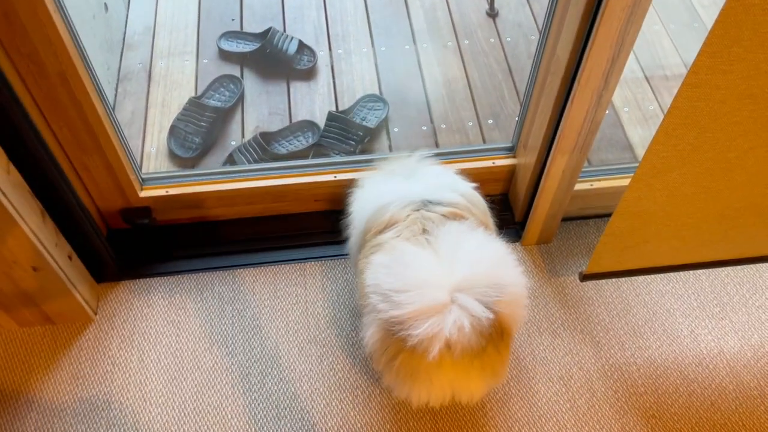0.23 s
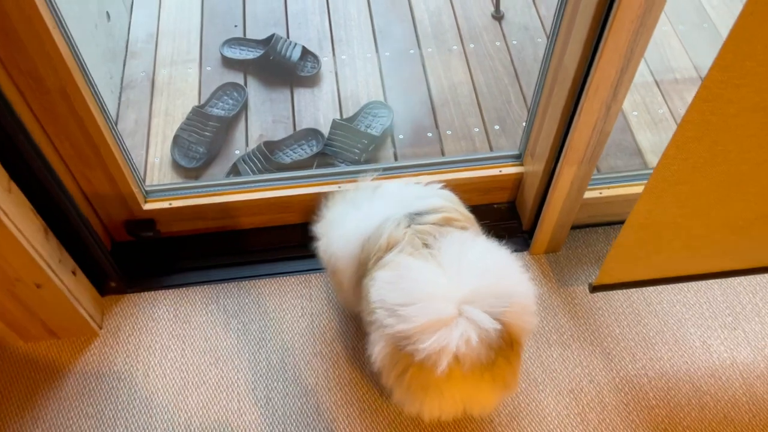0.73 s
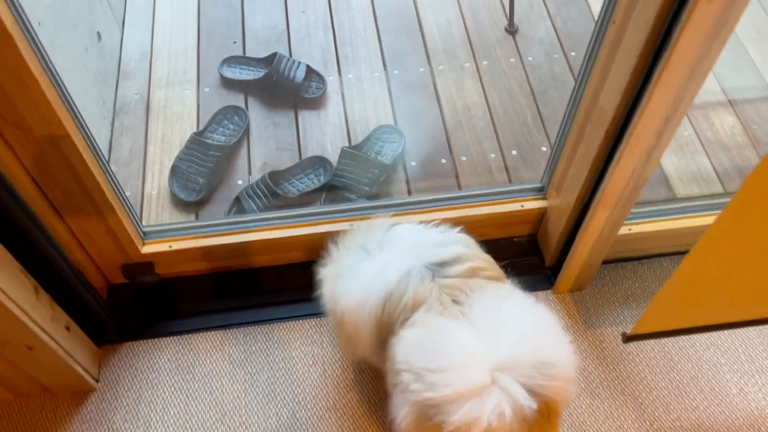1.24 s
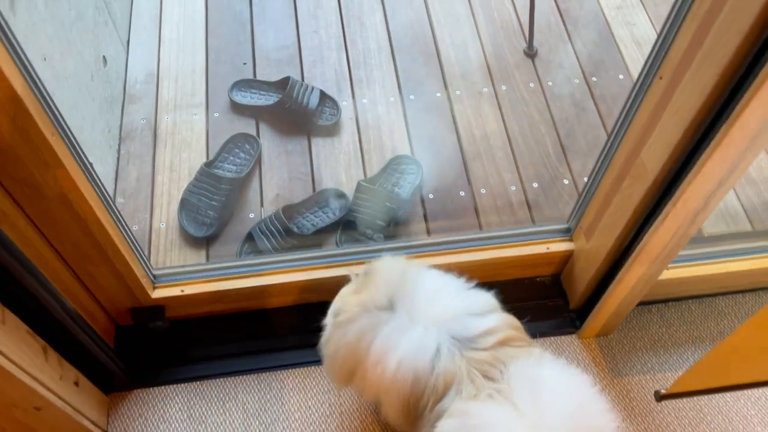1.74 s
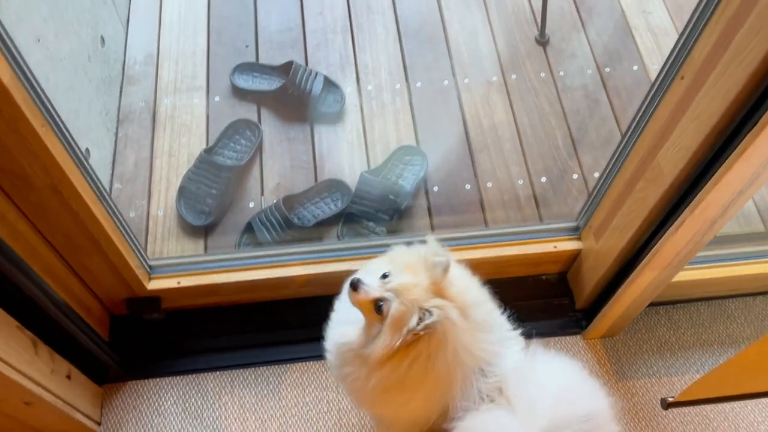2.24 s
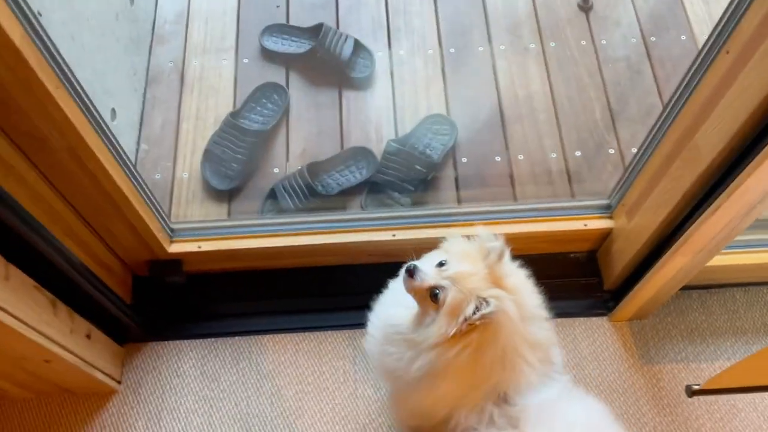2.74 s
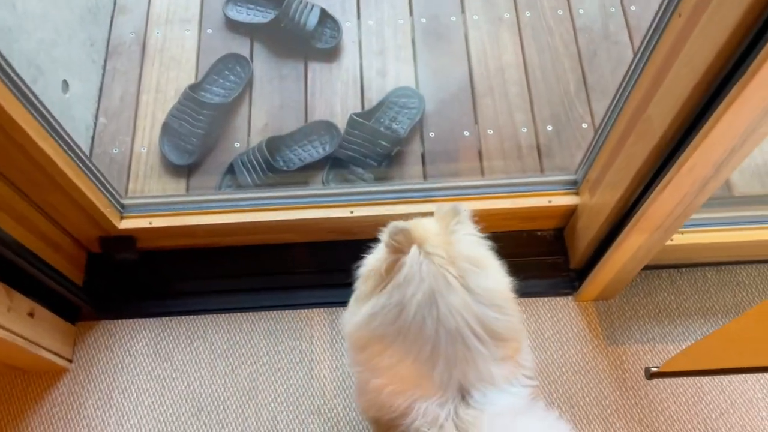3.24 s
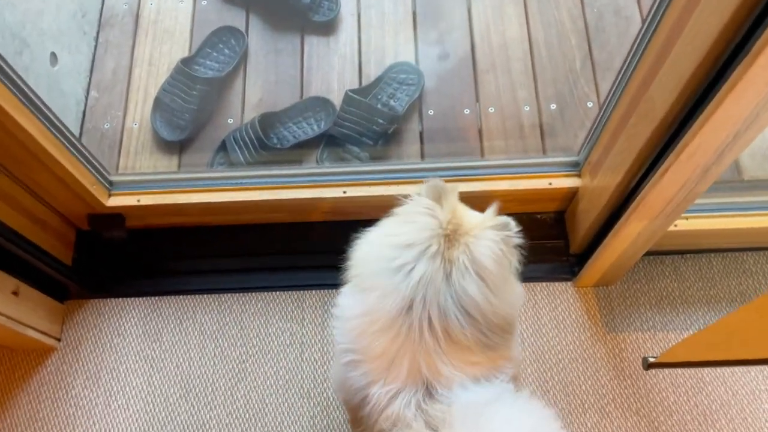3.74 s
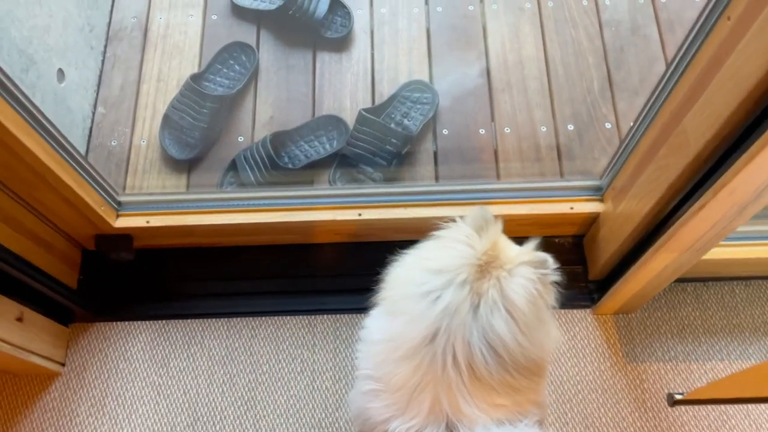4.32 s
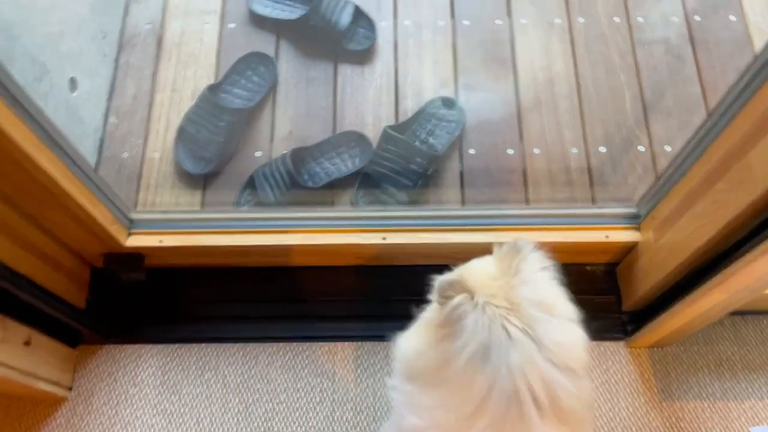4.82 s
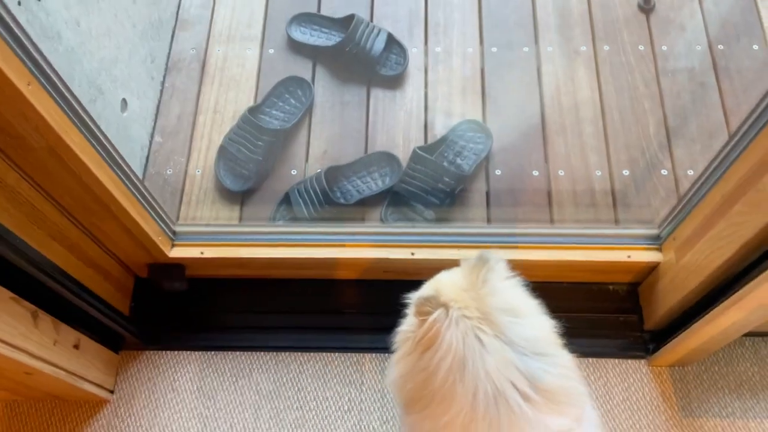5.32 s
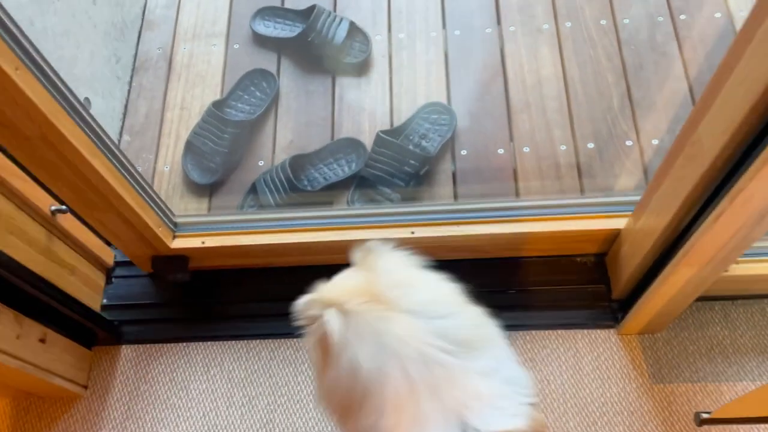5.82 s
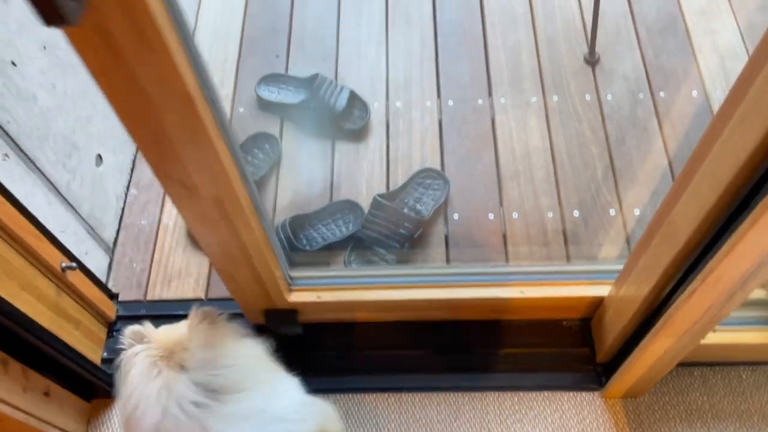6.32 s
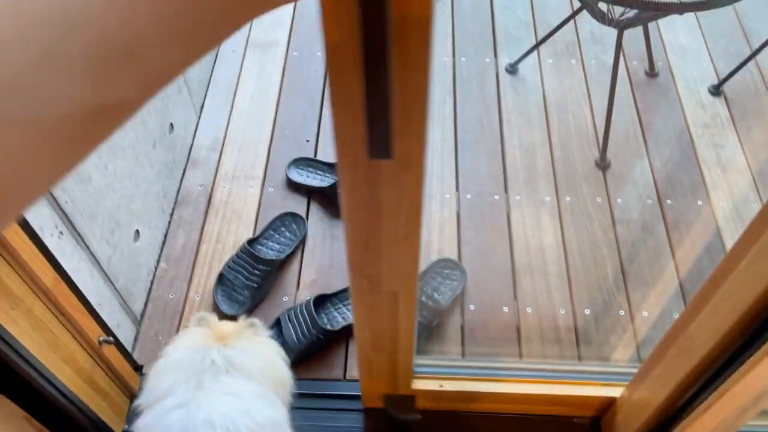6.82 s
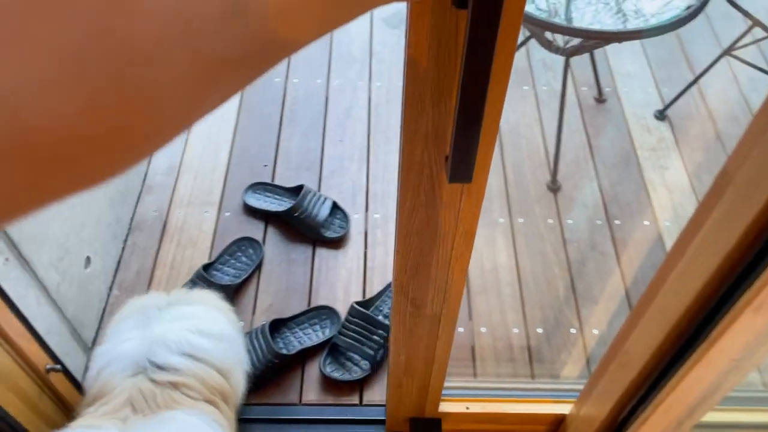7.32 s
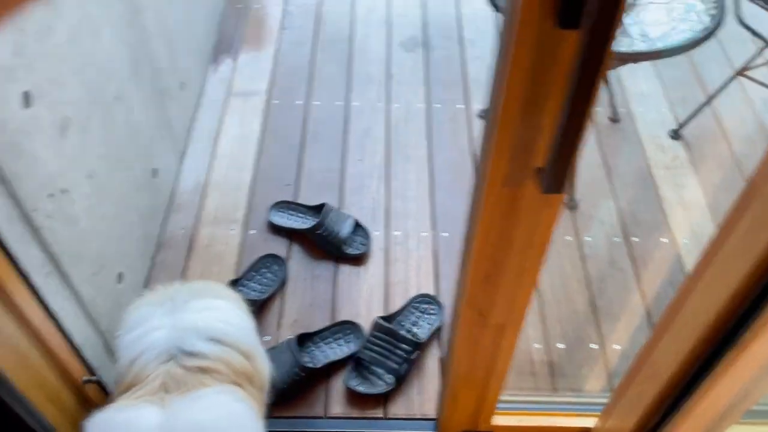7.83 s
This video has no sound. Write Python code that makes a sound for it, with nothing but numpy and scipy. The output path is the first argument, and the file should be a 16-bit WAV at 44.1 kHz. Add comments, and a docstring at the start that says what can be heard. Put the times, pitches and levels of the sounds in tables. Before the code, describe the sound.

Low house hum, dry bumps and soft rustling, then a metal latch clacks and a wooden glass door slides open with a rushing, squeaky hiss.

```python
"""A low house hum under a faint hiss comes first, then small dry bumps close to the microphone.
A small dog waits at a glazed sliding door: fur and clothes rustle, short knocks tap, thin whistles pass.
A hand scrapes and ticks the loose handle and the metal latch rings; the leaf thuds and rolls along its track,
hissing, rubbing and squealing. Friction is shaped noise; blows and knocks are sums of dying modes;
squeals and whines are noise in narrow moving resonances, and the room is a tail of sparse echoes."""
import sys
import numpy as np
from scipy import signal
from scipy.fft import rfft, irfft, next_fast_len
from scipy.io import wavfile
from scipy.ndimage import uniform_filter1d

SR = 44100
rng = np.random.default_rng(int(sys.argv[2]) if len(sys.argv) > 2 else 0)


def generate_wav(sig):
    """Save sig (samples, or channels by samples) to the path in sys.argv[1] as 16-bit PCM at SR."""
    pcm = np.round(np.clip(np.atleast_2d(sig).T, -1, 1) * 32767).astype(np.int16)
    wavfile.write(sys.argv[1], SR, pcm)


N = 355887

# likeness of the sound at the two microphone ports: pitch_hz, likeness (0 to 1)
LIKENESS = [(60, 0.97), (200, 0.89), (450, 0.5), (1300, 0.37), (2500, 0.3), (5000, 0.15), (7000, 0.3),
            (8700, 1), (11000, 0.63), (13500, 1), (16000, 1)]
# resonances of the loose handle: pitch_hz, width_hz, level_db (relative)
HANDLE_MODES = [(1080, 160.5, 1), (1900, 218, -8.5), (2650, 301, -11.5), (3500, 259, -5),
                (4650, 400, -13.5)]
# spectrum of the runner and its seals: pitch_hz, level_db (relative, per Hz)
RUNNER_SPECTRUM = [(400, -7.5), (900, -2), (1300, -2.5), (1800, -2.5), (2500, -1), (4200, -1), (5300, -5),
                   (6300, -12), (7500, -15.5), (10000, -19), (13000, -16), (16000, -24.5)]

TAP_T60_S = 0.05


def gain_of(db):
    """Turns dB into a gain."""
    return 10 ** (np.asarray(db) / 20)


def evened(x):
    """Scales to rms 1."""
    return x / np.sqrt(np.mean(x ** 2) + 1e-20)


def read(points, hz):
    """Reads a spectrum table on a log-frequency axis."""
    f, value = np.transpose(points)
    return np.interp(np.log(hz + 1), np.log(f + 1), value)


def curves(rows):
    """All columns of a curve table, sample by sample, and a soft window over its span."""
    s, *columns = np.transpose(rows)
    t = np.arange(N) / SR
    to_edge = np.minimum(t - s[0], s[-1] - t) / 0.012
    at_file_edge = (s[0] < 0.01) + (s[-1] > 8)  # no fade where the curve meets the start or end
    inside = (t >= s[0]) * (t <= s[-1] + (s[-1] > 8))
    window = np.clip(to_edge + at_file_edge, 0, 1) * inside
    return [np.interp(t, s, c) for c in columns], window


def swell(peak_s, db, rise_s, fall_s):
    """Power that climbs 20 dB in rise_s up to the peak and drops 20 dB in fall_s."""
    late = np.arange(N) / SR - peak_s
    steps_down = np.minimum(np.maximum(-late / rise_s, late / fall_s), 5)
    return gain_of(2 * (db - 20 * steps_down))  # doubled dB makes power


def chance(seconds):
    """Slow random wobble, rms 1: noise averaged twice over the given time."""
    size = round(seconds * SR)
    smooth = uniform_filter1d(rng.standard_normal(N), size=size)
    return evened(uniform_filter1d(smooth, size=size))


def add(mix, s, sound):
    """Mixes a stereo sound in at time s."""
    part = mix[:, round(s * SR):][:, :sound.shape[1]]
    part += sound[:, :part.shape[1]]


def panned(x, pan_db):
    """Places a mono sound left or right by its L-R level."""
    return x * gain_of([[pan_db / 2], [-pan_db / 2]])


def resonate(x, hz, width):
    """Shifts the curve hz down to zero, smooths twice (each pass width Hz wide), and shifts back."""
    turn = np.exp(2j * np.pi * np.cumsum(hz * np.ones(x.shape[-1])) / SR)
    r = np.exp(-np.pi * width / SR)
    smooth = signal.lfilter([(1 - r) ** 2], [1, -2 * r, r * r], x / turn, axis=-1)
    return (turn * smooth).real


def hiss(spectrum, size, patchy_db, lo_hz=0, hi_hz=20000, pan=((1, 0), (2, 0)), shape=(8, 6), peaks=()):
    """Stereo noise of a given spectrum between two edges, with patches (bins, frames) and peaks; rms 1."""
    hop, hz = size // 2, np.fft.rfftfreq(size, 1 / SR)
    a, b, c, d, patches = rng.standard_normal((N // hop + 3, len(hz), 5), dtype=np.float32).T
    patches = uniform_filter1d(patches, size=shape[0], axis=0)
    patches = evened(uniform_filter1d(patches, size=shape[1], axis=1))
    like = np.clip(read(LIKENESS, hz), 0, 1)[:, None]
    left = a + 1j * b
    right = like * left + np.sqrt(1 - like ** 2) * (c + 1j * d)
    lean = gain_of(read(pan, hz) / 2)[:, None]
    z = np.array([left * lean, right / lean])
    edges = 1 / np.sqrt((1 + (lo_hz / (hz + 1)) ** 8) * (1 + (hz / hi_hz) ** 8))
    rings_db = sum(db / (1 + (2 * (hz - f) / w) ** 2) for f, w, db in peaks)
    z *= gain_of((read(spectrum, hz) + rings_db)[:, None] + patchy_db * patches) * edges[:, None]
    return evened(signal.istft(z, window="cosine", nperseg=size, noverlap=hop)[1][:, :N])


def ring(modes, tilt_db=0, damping=1, length=SR // 4):
    """A struck set of modes (Hz, dB, t60 s); the tilt, dB an octave, turns about 2.4 kHz."""
    t = np.arange(length) / SR
    return sum(gain_of(db + tilt_db * np.log2(hz / 2400) - 60 * damping * t / t60) * np.sin(2 * np.pi * hz * t)
               for hz, db, t60 in modes)


def crack(t60, tilt_db=0):
    """A short burst of wide noise with a quick rise, tilted about 2.4 kHz."""
    t, hz = np.arange(SR // 4) / SR, np.fft.rfftfreq(SR // 4, 1 / SR)
    color = gain_of(tilt_db * np.log2((hz + 300) / 2400)) / (1 + (hz / 14000) ** 16)
    noise = irfft(rfft(rng.standard_normal(len(t))) * color, len(t))
    return evened(noise) * gain_of(-60 * t / t60) * (1 - np.exp(-t / 0.0004))


def whistle(rows, width, pan_db, flutter_db):
    """Noise in one narrow moving resonance, fluttering in level."""
    (db, hz), window = curves(rows)
    out, on = np.zeros(N), window > 0
    out[on] = evened(resonate(rng.standard_normal(N)[on], hz[on], width))
    return panned(out * gain_of(db + flutter_db * chance(0.018)) * window, pan_db)


def hum():
    """Low rumble with one fuzzy note, narrow-band noise, over a steady faint hiss."""
    # rumble of the house: pitch_hz, level_db (relative, per Hz)
    hum_spectrum = [(20, -68), (30, -51), (42, -22.5), (64, -5), (78, -4.5), (90, -12), (125, -17),
                    (215, -22.5), (335, -30.5), (490, -40.5), (700, -66.5)]
    # its level, raised 0.5 dB below: start_s, level_db
    hum_level = [(0.0, -49), (1.1, -49), (2.0, -47.5), (3.9, -45.5), (4.65, -45), (5.3, -44.5),
                 (6.5, -45.5), (8.07, -46.5)]
    # the fuzzy note: pitch_hz, width_hz, mean level_db
    fuzzy_note = (64.07, 11.9, -43)
    # faint hiss: pitch_hz, level_db (relative, per Hz)
    air_spectrum = [(500, -4), (900, -5), (1800, -10.5), (3000, -29), (6000, -30), (8700, -17),
                    (12500, -13.5), (13800, -25), (14500, -38)]
    (db,), _ = curves(hum_level)
    hz, width, note_db = fuzzy_note
    note = gain_of(note_db) * evened(resonate(rng.standard_normal(N), hz, width))
    low = gain_of(db + 0.5) * hiss(hum_spectrum, size=2048, patchy_db=2.5)
    faint = gain_of(-80.5) * hiss(air_spectrum, size=512, patchy_db=0.18, lo_hz=500)
    return low + panned(note * gain_of(db - db.mean()), 0.55) + faint


def rustle():
    """Fibres brush past each other: bright swish, with a duller part when weight shifts."""
    # rustling fur and cloth: pitch_hz, level_db (relative, per Hz)
    fibre_spectrum = [(300, 5.5), (450, 1.5), (1300, 0), (1800, -3.5), (4200, -3), (6300, -5.5),
                      (8700, -1.5), (13000, -6), (14500, -22), (16000, -25)]
    # swishes: peak_s, level_db (before the 2 dB lift), rise_s and fall_s (each over 20 dB), dull_db (relative)
    swish_rows = [(.385, -70.5, 0.08, 0.12, -9), (0.469, -59.5, 0.067, 0.026, -3),
                  (.95, -68, 0.14, 0.28, -20), (1.22, -74, 0.22, 0.31, -14), (1.558, -70.5, 0.02, 0.088, 3),
                  (1.852, -58, .007, .02, -13), (1.89, -74, 0.059, 0.8, 3), (2.115, -46, 0.018, 0.14, -12),
                  (2.32, -58, 0.11, 0.24, 7), (2.5, -55.5, 0.12, 0.092, 1), (2.6, -63.5, .2, 0.3, -2.5),
                  (2.815, -52.5, 0.046, 0.24, -5), (2.92, -60, 0.2, 0.081, -18), (3.0, -71.5, .1, .55, 5.5),
                  (3.495, -53, 0.078, 0.38, -12.5), (3.72, -58.5, 0.36, 0.059, -9),
                  (3.98, -73, .04, 0.13, 17), (4.084, -67, 0.21, .27, 10), (4.3, -74, .4, 0.22, 3),
                  (4.44, -64.5, 0.095, 0.48, 7), (4.626, -39, 0.012, 0.032, -4),
                  (4.68, -58, 0.089, 0.17, 8.5), (5.2, -61, 0.097, 0.1, 9),
                  (5.312, -52.5, 0.018, 0.11, 6.5), (5.59, -63.5, 0.38, .04, 2)]
    # a dull low rustling bed dips, then gradually grows louder: start_s, level_db (before the 0.5 dB lift)
    bed_rows = [(0.0, -80), (.6, -89), (1.4, -87), (1.65, -75.5), (2.75, -81), (3.3, -70.5), (3.9, -63.5),
                (4.25, -65), (4.5, -63), (4.9, -62.5), (5.6, -58.5)]
    (bed_db,), window = curves(bed_rows)
    swells = [swell(*row[:4]) for row in swish_rows]
    weight = sum(power * gain_of(2 * row[4]) for power, row in zip(swells, swish_rows))
    weight = weight + (window * gain_of(bed_db)) ** 2
    bright = hiss(fibre_spectrum, size=256, patchy_db=1.5, lo_hz=1500, shape=(4, 6))
    dull = hiss(fibre_spectrum, size=512, patchy_db=1.5, lo_hz=337, hi_hz=1780)
    return gain_of(2.0) * np.sqrt(sum(swells)) * bright + gain_of(0.5) * np.sqrt(weight) * dull


def taps(rows, t60):
    """Each tap is a dead knock: a noisy burst about its pitch, a woody thump and a crack."""
    # the wooden frame thumps with: pitch_hz, level_db (relative), t60_s (for a full-length tap)
    frame_modes = [(407, -2.5, 0.046), (640, -8, 0.032)]
    out = np.zeros((2, N))
    for s, db, hz, crack_db, thump_db, pan_db in rows:
        body = resonate(crack(t60, -1.8), hz, hz * 1.08)
        body = body / abs(body).max() + ring([(hz, -8, t60 * 0.54)])
        thump = gain_of(thump_db) * ring(frame_modes, damping=TAP_T60_S / t60)
        bright = gain_of(crack_db - 3.5) * crack(t60 * 0.75, 7.8)
        add(out, s, panned(gain_of(db) * (body + thump + bright), pan_db))
    return out


def bumps():
    """Short dry bumps close to the microphone: the same knocks as the taps, dying sooner."""
    # start_s, level_db, pitch_hz, crack_db (before a 3.5 dB cut), thump_db, left_minus_right_db
    bump_rows = [(0.175, -57, 900, -20, -9, -9.5), (0.429, -46, 820, -18, -11, 2.5),
                 (0.4705, -36.5, 840, -14, -8, 2.5)]
    return taps(bump_rows, t60=0.018)


def small_taps():
    """Short dull and bright knocks, some giving body to the latch blows."""
    # start_s, level_db, pitch_hz, crack_db (before a 3.5 dB cut), thump_db, left_minus_right_db
    tap_rows = [(1.553, -59, 4700, -6, -15, 5), (1.592, -62, 1500, -3, -12, 4),
                (1.851, -50.5, 4730, 8, -18, 1.5), (1.896, -58, 6500, 5, -25, 3),
                (1.982, -59, 7200, 0, -25, 5), (1.992, -59, 7000, 2, -25, 6),
                (2.2655, -37.5, 1880, -5, -12, 3), (2.284, -39, 420, -30, -5, 4),
                (2.321, -36, 890, -12, -12, 5), (2.322, -37, 4300, -8, -25, 7),
                (2.388, -45, 1050, -25, -7, 6), (2.484, -42.5, 900, -17, -12, 0),
                (2.498, -30, 2800, -4, -21, 4), (2.513, -45, 550, -25, -5, 0.5),
                (2.563, -53, 1100, -25, -20, 4), (2.657, -55, 1500, -8, -20, 5),
                (2.79, -46, 2450, -12.5, -14, 2.5), (2.997, -51.5, 1330, 10, -13, 5),
                (3.632, -43, 1300, -4, -19, 0.5), (3.685, -51, 639, -12, -14, 5),
                (3.79, -60.5, 4000, -10, -25, 3), (3.827, -50, 720, -19, -12, 4),
                (3.974, -49, 2200, -25, -4, 4), (4.04, -41.5, 1300, -30, -14, 2),
                (4.068, -57, 3000, -20, -25, 2), (4.087, -43, 890, -25, -10, -1),
                (4.339, -46, 4500, -13, -18, 7), (4.349, -51, 4300, -18, -20, 5),
                (4.382, -31, 3100, -30, -27, 2), (4.388, -36, 1750, -30, -25, 2),
                (4.413, -41, 700, -30, -10, 3), (4.43, -43, 900, -30, -12, 3),
                (4.385, -30, 520, -30, -13, 3.5), (4.396, -38, 1100, -30, -17, 4),
                (4.633, -30, 1650, -30, -20, 3), (4.62, -33, 1500, -30, -20, 4),
                (4.626, -32, 3300, -20, -25, 2), (4.657, -37, 3300, -20, -25, 2),
                (4.629, -24, 1150, -30, -21, 4), (4.645, -30.5, 900, -30, -12, 5.5),
                (4.663, -33.5, 750, -31, -12.5, 3), (4.677, -36, 1300, -30, -13, 1),
                (5.16, -37, 1050, -29, -18, 8.5), (5.2, -43, 675, -12, -12, 5),
                (5.309, -30, 1080, -24, -21, 7), (5.331, -39, 1050, -25, -22, 6),
                (5.42, -41.5, 1500, -9, -15, 1), (5.454, -35, 1180, -30, -21, 7),
                (5.586, -31, 1780, -23, -20, 4), (5.952, -35, 900, -30, -11, -5),
                (6.2, -34, 2450, -16, -20, 0)]
    return taps(tap_rows, TAP_T60_S)


def paw_drags():
    """Faint coloured rubs as a paw drags: noise in two broad moving resonances."""
    # the upper rub: start_s, level_db, pitch_hz
    drag_high = [(.86, -84, 5600), (.95, -76, 5800), (1.04, -80, 5600), (1.1, -88, 5500)]
    # the lower rub: start_s, level_db, pitch_hz
    drag_low = [(.95, -88, 1950), (1.03, -83, 2000), (1.09, -88, 2050), (1.14, -81, 2150),
                (1.17, -88, 2250)]
    return whistle(drag_high, 1400, 1.2, 1.5) + whistle(drag_low, 500, 1.2, 2.5)


def scrape():
    """The handle scrapes under the hand: uneven gritty friction through its resonances."""
    # start_s, level_db
    scrape_rows = [(1.56, -77), (1.65, -80), (1.72, -73), (1.78, -77), (1.83, -75), (1.88, -71),
                   (1.95, -75), (2.04, -76), (2.06, -64), (2.1, -53)]
    (db,), window = curves(scrape_rows)
    grit = rng.standard_normal(N) * gain_of(5.0 * chance(0.0035) + 3.0 * chance(0.015))
    tilt_db = -3.5  # per octave, about 1 kHz
    tone = sum(gain_of(d + tilt_db * np.log2(hz / 1000)) * evened(resonate(grit, hz, 2.6 * w))
               for hz, w, d in HANDLE_MODES)
    return panned(evened(tone) * gain_of(db) * window, 3.3)


def handle():
    """Rough little ticks: noise bursts through the broad resonances of the loose handle."""
    # start_s, level_db, brightness_db (per octave, about 2.4 kHz)
    tick_rows = [(1.678, -58, -7), (1.714, -52, -4), (1.765, -61, -3), (1.802, -52, -1), (1.851, -52, 3.5),
                 (1.873, -56, -9), (1.896, -54, 2.5), (1.964, -55, -2), (1.979, -59, 2), (2.054, -57, -7),
                 (2.075, -48, 4), (2.088, -45, -6), (2.106, -30, -1), (2.277, -42, -2), (2.300, -39, 3),
                 (2.314, -39, -.6), (2.334, -41, 1), (2.361, -39, 0), (2.376, -44, -2), (2.527, -46, 1)]
    out = np.zeros((2, N))
    detunings = 1 + 0.07 * rng.standard_normal((len(tick_rows), len(HANDLE_MODES)))
    for (s, db, tilt_db), detuning in zip(tick_rows, detunings):
        burst = crack(t60=0.019)
        tick = sum(gain_of(d + tilt_db * np.log2(hz / 2400)) * resonate(burst, hz * o, w) * np.sqrt(SR / w)
                   for (hz, w, d), o in zip(HANDLE_MODES, detuning))
        add(out, s, panned(gain_of(db) * tick, 4.7))
    return out


def latch():
    """Metal blows ring the latch, and a hand on it damps the ring."""
    # the latch rings with: pitch_hz, level_db (relative), t60_s (before the grip)
    latch_modes = [(1083, -13.5, 0.1), (1393, -15.5, 0.11), (1940, -12.5, 0.087), (2046, -20, .1),
                   (2400, -0.5, 0.088), (2465, -4.5, 0.025), (2400, -27, 0.65), (2832, -15, .13),
                   (2930, -20, 0.18), (3200, -16, .12), (3300, -4, .021), (3700, -10, .066),
                   (4290, -25, .12), (4764, -4.5, 0.041), (4764, -33, 0.7), (4930, -16.5, 0.063),
                   (5265, -24.5, .17), (5814, -16, 0.021), (6551, -24, .1), (7079, -23, 0.047),
                   (12130, -13.5, 0.04), (12400, -12.5, 0.05), (13360, -12, .035)]
    # blows: start_s, level_db, brightness_db (per octave), grip_db_per_s, crack_db, left_minus_right_db
    blow_rows = [(2.1032, -18.5, 1.5, 5, -9, 3), (4.3817, -14, -13, 6000, -24, 1),
                 (4.391, -27, -10, 4000, -16, 4), (4.419, -38, -5, 3000, -20, -1),
                 (4.6217, -23, -2, 4000, -10, 2), (4.6278, -26, 11, 3500, -5, 0),
                 (4.642, -19, -3, 3500, -14, 7), (4.656, -28, 3, 2498, -14, 1),
                 (4.670, -35, 1, 2500, -11, 0.5), (4.685, -39, -2, 3000, -7, -1),
                 (4.696, -41, 3, 3000, -5, 1), (4.706, -42, -1, 3000, -6, 1), (4.722, -46, -5, 3000, -6, 1),
                 (4.735, -46, -3, 3000, -6, 1), (4.748, -47, -2, 3000, -6, 1)]
    out, t = np.zeros((2, N)), np.arange(SR // 4) / SR
    rise = 1 - np.exp(-t / 0.0017)
    stopped_s, stop_db_per_s = 0.2, 400  # the free ring is caught after a moment
    waver_db = 3.5  # each ringing mode wavers randomly in level
    for s, db, tilt_db, grip, crack_db, pan_db in blow_rows:
        noise = evened(uniform_filter1d(rng.standard_normal((len(latch_modes), len(t))), size=180))
        wavers = waver_db * np.minimum(t / 0.03, 1) * noise
        metal = sum(gain_of(waver) * ring([mode], tilt_db) for mode, waver in zip(latch_modes, wavers))
        held = gain_of(-grip * t - stop_db_per_s * np.maximum(t - stopped_s, 0))
        click = gain_of(crack_db) * crack(0.08, 0.22 * tilt_db)
        add(out, s, panned(gain_of(db) * (rise * held * metal + click), pan_db))
    return out


def knocks():
    """The heavy leaf booms when it is jolted: its low modes ring and die."""
    # the door leaf rings with: pitch_hz, level_db (relative), t60_s
    leaf_modes = [(45.2, -9.5, 0.4), (63.93, 2, 0.15), (113.5, -13.5, 0.52), (188.3, -2.5, 0.27),
                  (254, -6, 0.15), (398, -17, 0.13), (479, -15.5, .08), (603, -22, 0.04), (933, -18, 0.25),
                  (1214, -20, .06), (1604, -25, .1)]
    # knocks: start_s, level_db, weight_db (added below 100 Hz)
    knock_rows = [(2.271, -39.5, -10.5), (2.501, -41.5, -15), (4.385, -40.5, -9), (4.631, -18.5, -13),
                  (4.652, -35, 13.5)]
    out = np.zeros((2, N))
    rise = 1 - np.exp(-np.arange(SR // 2) / SR / 0.0015)
    for s, db, weight_db in knock_rows:
        weighted = [(hz, d + weight_db * (hz < 100), t60) for hz, d, t60 in leaf_modes]
        boom = rise * ring(weighted, length=SR // 2)
        add(out, s, panned(gain_of(db) * boom, 1.5))
    return out


def whines():
    """Thin faint whistles, likely the dog's nose: noise in narrow gliding resonances."""
    # one curve for each whistle: start_s, level_db, pitch_hz
    whine_curves = [
        [(5.03, -88, 5900), (5.065, -71, 8000), (5.11, -78, 9700), (5.15, -78, 10200), (5.2, -76, 10900),
         (5.25, -71, 11400), (5.3, -76, 10900), (5.35, -74, 11200), (5.39, -76, 10900)],
        [(5.06, -73, 8600), (5.1, -76, 9600)],
        [(5.13, -78, 12200), (5.18, -75, 12400), (5.225, -76, 12900), (5.25, -66, 12920), (5.3, -70, 12750),
         (5.36, -67, 12800), (5.4, -68, 12700)],
        [(5.22, -80, 9300), (5.285, -78, 8500), (5.33, -77, 9000), (5.39, -79, 8500)],
        [(2.33, -68, 12700), (2.37, -67, 13000), (2.46, -68, 13100)],
        [(2.35, -76, 11500), (2.41, -70, 11600), (2.465, -73, 11950)],
        [(2.51, -70, 6500), (2.565, -72, 6200)],
        [(2.58, -78, 6060), (2.62, -67, 6720), (2.655, -67, 5900)],
        [(2.59, -69, 10400), (2.625, -67, 10650), (2.65, -73, 10450)],
    ]
    return sum(whistle(rows, 90, 0.3, 2.3) for rows in whine_curves)


def catches(lo_hz, hi_hz, count=40):
    """Grit catches in the track, sparse and uneven, each ringing one of many narrow modes; rms 1."""
    per_s, t60_s = 1100, 0.09
    size = gain_of(3.4 * np.minimum(rng.exponential(1, N), 5)) * (rng.random(N) < per_s / SR)
    mode, t, out = rng.integers(0, count, N), np.arange(SR // 10) / SR, np.zeros((2, N))
    for k, (place, lean) in enumerate(rng.random((count, 2))):
        hz = lo_hz + (hi_hz - lo_hz) * (k + place) / count
        decay = gain_of(read(RUNNER_SPECTRUM, hz) - 60 * t / t60_s)
        note = decay * np.minimum(t / 0.0034, 1) * np.sin(2 * np.pi * hz * t)
        out += panned(signal.oaconvolve(size * (mode == k), note)[:N], 12 * lean - 6)
    return evened(out)


def runner():
    """Brush seals hiss and fizz on the frame while the rollers drone through the leaf."""
    # along the slide: start_s, hiss_db, body_db (before a 0.5 dB lift), fizz_db (before a 6 dB lift)
    glide_rows = [(5.42, -77, -63, -89), (5.58, -57, -52, -67.5), (5.7, -54.5, -49, -60.5),
                  (5.82, -47.5, -48, -61), (5.96, -44.5, -45.5, -56), (6.04, -44, -52.5, -59.5),
                  (6.16, -40.5, -53, -57), (6.3, -44, -53.5, -58.5), (6.55, -43.5, -54, -56.5),
                  (6.745, -41.5, -48.5, -55.5), (6.8, -42, -42.5, -55), (7.0, -41, -42, -57),
                  (7.2, -44.5, -44.5, -57), (7.4, -48, -47.5, -56.5), (7.6, -51, -50.5, -58.5),
                  (7.76, -51, -52.5, -60.5), (8.07, -52, -52.5, -61.5)]
    # a hollow of the track colours the body: start_s, level_db (relative), pitch_hz
    hollow_rows = [(5.42, -11, 2000), (5.73, -8, 2350), (5.9, -13, 1900), (6.15, -10, 2480),
                   (6.7, -12, 2650), (6.78, -9, 1940), (6.95, -5.5, 2030), (7.2, -7.5, 2400),
                   (7.6, -5, 2800), (7.8, -8, 2920), (8.07, -14, 3000)]
    # brief scuffs where the seal catches: peak_s, level_db
    scuff_rows = [(5.588, -44), (5.995, -45), (6.203, -38.5), (6.457, -35.5), (6.55, -43), (6.622, -36.5),
                  (6.695, -35), (6.8, -41), (7.672, -47.5), (7.726, -46)]
    # the seal lets go for a moment: centre_s, change_db
    lull_rows = [(6.42, -3), (6.495, -5), (6.6, -6), (6.653, -6), (6.745, -6), (7.31, -2), (7.64, -7)]
    # side of the slide: pitch_hz, left_minus_right_db
    glide_pan = [(60, 0.5), (180, 7), (550, 2), (1650, 1.5), (4970, 1), (15000, -1.5)]
    # the rubbed leaf rings at: pitch_hz, width_hz, level_db (added)
    glass_peaks = [(2080, 150, 3), (2570, 130, 4), (3020, 110, 2.5), (3550, 140, 4), (4090, 140, 3.5),
                   (4800, 150, 5), (5250, 160, 6.5), (6200, 200, 4.5)]
    # the rolling leaf drones: pitch_hz, width_hz, level_db (relative)
    roll_modes = [(126.6, 28, 0.5), (177.8, 20.7, -2.5), (243.8, 16, -5)]
    # and rumbles: pitch_hz, level_db (relative, per Hz)
    wash_spectrum = [(70, -42), (110, 2.5), (250, -6), (420, -8.5), (600, -16.5), (900, -53)]
    (db, mid_db, fizz_db), window = curves(glide_rows)
    (hollow_db, hollow_hz), _ = curves(hollow_rows)
    t = np.arange(N) / SR

    def brushed(size, patchy_db, **settings):
        """Noise of the runner's spectrum, placed by the slide's pan."""
        return hiss(RUNNER_SPECTRUM, size, patchy_db, pan=glide_pan, **settings)

    streaks = (2, 4)  # many narrow modes of glass and frame come and go
    top = brushed(1024, 3.5, lo_hz=3300, hi_hz=6860, shape=streaks, peaks=glass_peaks)
    fizz = brushed(256, 2.0, lo_hz=6940)
    mid = brushed(1024, 3.5, lo_hz=1580, hi_hz=3300, shape=streaks, peaks=glass_peaks)
    dull = brushed(512, 3.0, lo_hz=383, hi_hz=1580)
    catch_db = -3
    top = evened(top + gain_of(catch_db) * catches(3200, 5800))
    mid = evened(mid + gain_of(catch_db) * catches(1599, 3300))
    mid = evened(mid + gain_of(hollow_db) * evened(resonate(mid, hollow_hz, 1500)))

    grows_db = 2.5 * (t - glide_rows[0][0])  # the lowest drone swells, 2.5 dB per s against the others
    drone = sum(gain_of(d + grows_db * (hz < 150)) * evened(resonate(rng.standard_normal(N), hz, w))
                for hz, w, d in roll_modes)
    drone = evened(drone * window)
    rumble = 0.43 * panned(drone, 1.9) + 0.42 * hiss(wash_spectrum, size=1024, patchy_db=1.5)
    rumble *= gain_of(-44.5 + 1.5 * chance(0.024))

    # dirt under the rollers roughens the level
    grit = gain_of(0.56 * evened(uniform_filter1d(rng.standard_normal(N), size=250)))
    grit *= gain_of(sum(d * np.exp(-((t - s) / 0.019) ** 2) for s, d in lull_rows))

    scuff_power = sum(swell(s, scuff_db, rise_s=0.028, fall_s=0.039) for s, scuff_db in scuff_rows)
    scuff = np.sqrt(scuff_power) * brushed(512, 2.0, lo_hz=1200, hi_hz=4970, peaks=glass_peaks)
    # the dull part follows the body by a share
    dull *= gain_of(-54 + 0.55 * (mid_db - mid_db[window > 0].mean()))
    rubbed = grit * (gain_of(db) * top + gain_of(mid_db + 0.5) * mid + dull + scuff)
    return window * (rubbed + gain_of(fizz_db + 6) * fizz + rumble)


def starting_creak():
    """A rising creak as the leaf starts: noise in a narrow climbing resonance."""
    # start_s, level_db, pitch_hz
    slip_rows = [(5.45, -58, 1010), (5.53, -61, 1000), (5.555, -45, 1380), (5.575, -58, 1480)]
    return whistle(slip_rows, 120, 1.5, 1.5)


def stutter():
    """A seal stutters on the frame: uneven slips ring two of its resonances."""
    # start_s, level_db (before a 1 dB cut), low resonance pitch_hz
    stutter_rows = [(5.812, -50, 1250), (5.824, -38, 1348), (5.84, -37.5, 1702), (5.96, -36, 1837),
                    (5.988, -38, 1809.5), (6.01, -55, 1780)]
    (db, hz), window = curves(stutter_rows)
    slips_per_s = 200 * (1 + 3.9 * uniform_filter1d(rng.standard_normal(N), size=200))
    turns = np.cumsum(slips_per_s) / SR
    slips = np.diff(np.floor(turns), prepend=0) * gain_of(2.4 * rng.standard_normal(N))
    slips = evened(slips) + 0.42 * rng.standard_normal(N)
    top_hz, top_width_hz, top_db = 2210, 460, -4
    tone = evened(resonate(slips, hz, 203)) + gain_of(top_db) * evened(resonate(slips, top_hz, top_width_hz))
    return panned(evened(tone) * gain_of(db - 1.0) * window, 0.85)


def groan():
    """Two fuzzy fluttering whistles: noise in narrow resonances that drift."""
    # the upper one: start_s, level_db, pitch_hz
    groan_high = [(5.945, -48, 950), (6.01, -53, 795), (6.1, -51.5, 820), (6.3, -51.5, 830),
                  (6.43, -51, 793), (6.66, -49.5, 840), (6.8, -54.5, 896), (6.86, -66, 920)]
    # the lower one: start_s, level_db, pitch_hz
    groan_low = [(5.945, -50, 640), (6.1, -52, 640), (6.26, -59.5, 646), (6.41, -49, 638), (6.51, -55, 660),
                 (6.6, -51, 665)]
    return whistle(groan_high, 150, 0.8, 2.1) + whistle(groan_low, 75, 0.77, 1.3)


def squeal():
    """A thin high whistle that breaks up, riding up and down with each turn of a roller."""
    # start_s, level_db, pitch_hz (centre of the warble)
    squeal_rows = [(6.2, -62, 14000), (6.28, -59, 14900), (6.46, -63, 14800), (6.52, -50, 15000),
                   (6.7, -52, 15050), (6.86, -53, 15150), (6.93, -62, 15200)]
    (db, hz), window = curves(squeal_rows)
    warble_hz, warbles_per_s, warble_top_s = 230, 13.6, 6.63
    turn = np.cos(2 * np.pi * warbles_per_s * (np.arange(N) / SR - warble_top_s))
    tone = evened(resonate(rng.standard_normal(N), hz + warble_hz * turn, 260))
    return panned(tone * gain_of(db + 3.6 * chance(0.01)) * window, 0.1)


def late_note():
    """A steady low note joins as the leaf slows: a sine with slight wobbles of pitch and level."""
    # start_s, level_db, pitch_hz
    note_rows = [(7.2, -68, 311.2), (7.29, -55, 311.3), (7.7, -53.5, 312), (7.97, -51, 313),
                 (8.07, -50.5, 310.8)]
    (db, hz), window = curves(note_rows)
    turns = np.cumsum(hz + 0.74 * chance(0.1)) / SR
    tone = np.sqrt(2) * np.sin(2 * np.pi * turns)
    return panned(tone * gain_of(db + 0.77 * chance(0.067)) * window, 1.2)


def late_rub():
    """A faint rub as the leaf slows: noise in one narrow resonance."""
    # start_s, level_db, pitch_hz
    rub_rows = [(7.55, -70, 1690), (7.75, -60, 1700), (7.95, -57, 1740), (8.07, -56, 1780)]
    return whistle(rub_rows, 200, 0.8, 1.5)


def room(x):
    """Sparse echoes of random sign, each band dying at its own speed and partly alike at both ports."""
    # pitch_hz, t60_s
    room_decay = [(150, 0.46), (600, 0.3), (2500, 0.22), (8000, 0.12), (15000, 0.041)]
    echoes = np.zeros((2, SR // 2))
    slots = np.arange(200, SR // 2 - 20, 20)  # one echo in every 20 samples
    at = slots + rng.integers(0, 20, (2, (SR // 2 - 201) // 20))
    np.put_along_axis(echoes, at, rng.choice([-1., 1.], at.shape), 1)
    hz, t, (left, other) = signal.stft(echoes, SR, nperseg=256)
    like = np.clip(read(LIKENESS, hz), 0, 1)[:, None]
    z = np.array([left, like * left + np.sqrt(1 - like ** 2) * other])
    tail = signal.istft(z * gain_of(-60 * t / read(room_decay, hz)[:, None]), SR, nperseg=256)[1]
    return signal.fftconvolve(x, tail / np.linalg.norm(tail[0]), axes=1)[:, :N]


def ports(x, leads):
    """The two microphone ports differ in phase, by the side a sound comes from."""
    size = next_fast_len(N)
    lead = np.interp(np.fft.rfftfreq(size, 1 / SR), *np.transpose(leads))
    right = irfft(rfft(x[1], size) * np.exp(1j * lead), size)[:N]
    return np.array([x[0], right])


def scene():
    """Hits and rubs near the door, their room tail, and the steady sounds."""
    # phase at the microphone, sounds from the latch side: pitch_hz, right_lead_rad
    latch_leads = [(0, 0), (1640, -3.1), (2350, -6.2), (2840, -7.2), (3530, -8.0), (4220, -12.0),
                   (5000, -12.8), (5680, -14), (6200, -13.5), (7490, -15.7), (10200, -15.2), (12300, -13.0),
                   (16500, -12.3)]
    # phase at the microphone, all other sounds: pitch_hz, right_lead_rad
    other_leads = [(400, 0), (1400, 1.6), (2500, 0), (4500, -.8), (6000, .3), (7500, 2.8), (8700, 3.14),
                   (10000, 3.5), (11500, 5.0), (13300, 6.2), (16000, 6.28)]
    hits, metal = small_taps() + handle(), latch()
    rubs = scrape() + starting_creak() + stutter() + groan() + squeal() + late_note() + late_rub()
    dog = paw_drags() + whines()
    tail = room(gain_of(-9.0) * hits + gain_of(-17) * metal + gain_of(-17.5) * rubs)
    near = bumps() + hits + metal + knocks()
    around = hum() + rustle() + dog + runner() + rubs + tail
    return ports(near, latch_leads) + ports(around, other_leads)


def record(dry):
    """The band limit: a steep low-pass at 15.8 kHz."""
    low_pass = signal.firwin(511, 15800, window=("kaiser", 9), fs=SR)
    return signal.oaconvolve(dry, low_pass[None], "same")


dry = scene()
out = record(dry)
generate_wav(out)
```